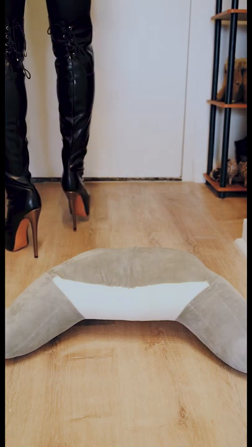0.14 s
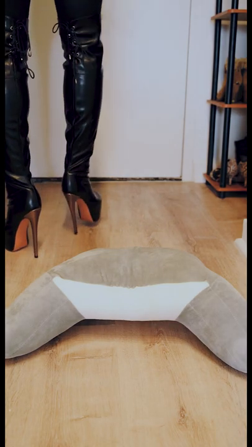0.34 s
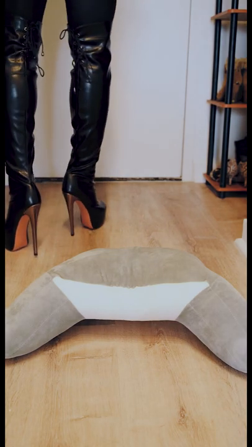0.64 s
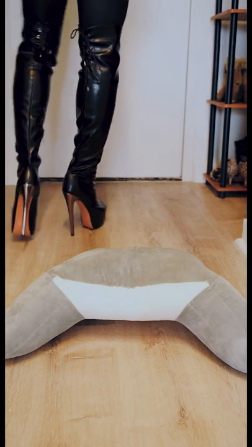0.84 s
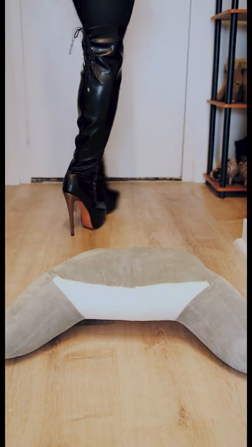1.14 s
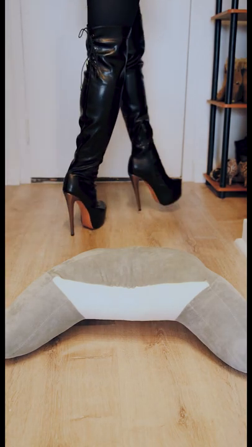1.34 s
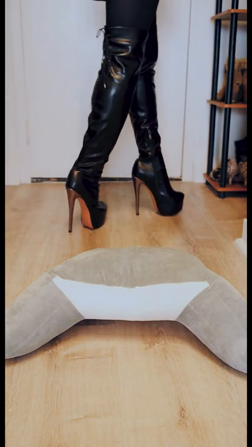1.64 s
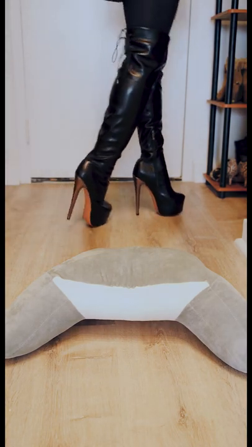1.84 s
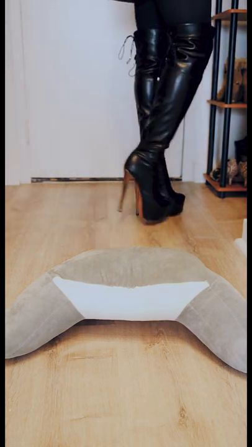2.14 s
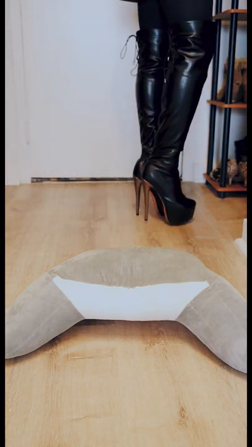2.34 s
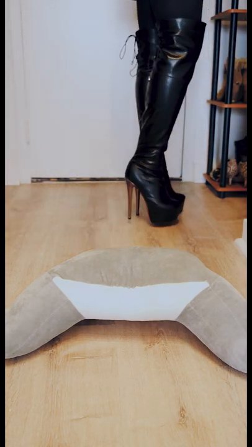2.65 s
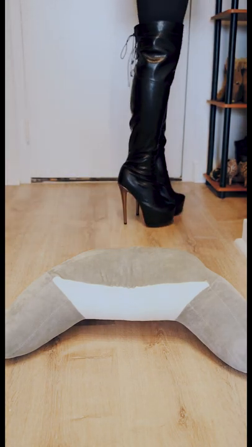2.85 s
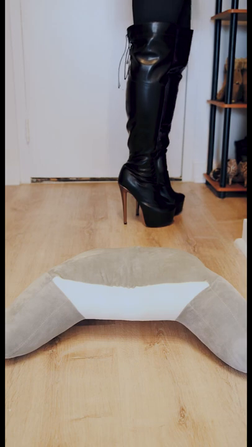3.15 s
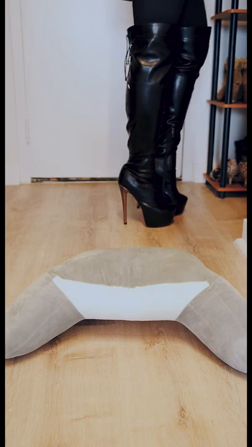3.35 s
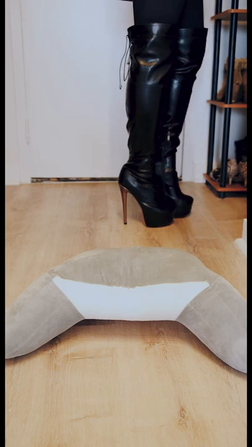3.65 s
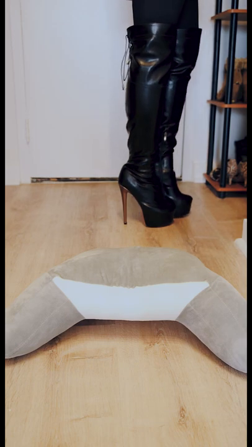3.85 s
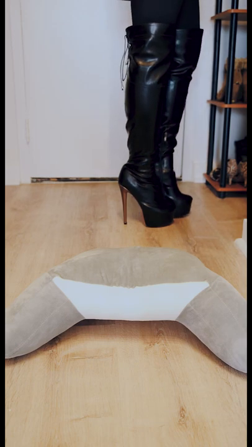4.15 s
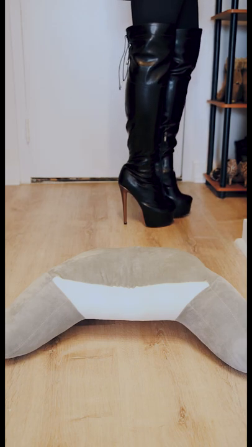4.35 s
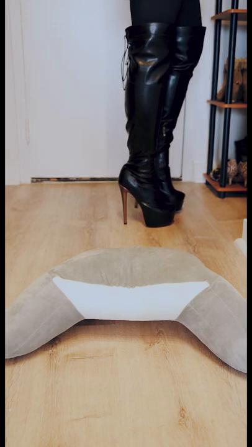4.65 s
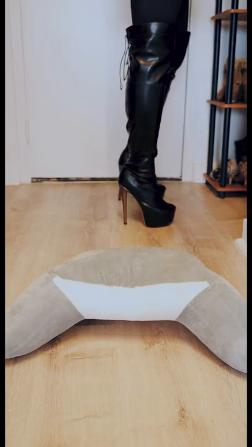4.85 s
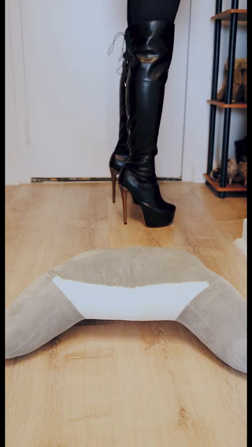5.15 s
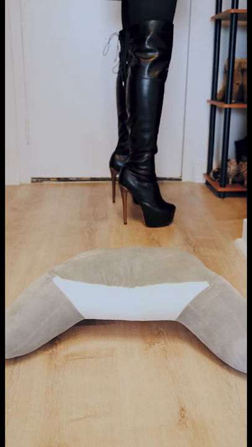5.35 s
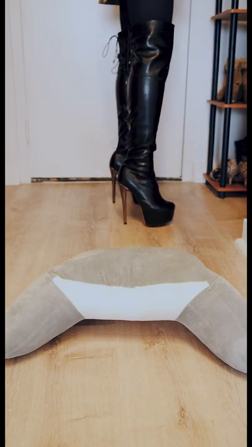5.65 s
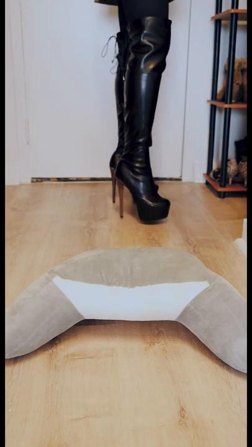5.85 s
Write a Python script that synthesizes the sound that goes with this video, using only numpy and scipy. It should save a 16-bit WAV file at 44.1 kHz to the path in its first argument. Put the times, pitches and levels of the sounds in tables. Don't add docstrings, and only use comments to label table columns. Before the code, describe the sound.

Hard stiletto-heeled platform boots take slow, uneven steps on a wooden floor in a small room, with scuffs, leather rustle and a low hum.

```python
import sys
import numpy as np
from scipy import signal
from scipy.fft import rfft, irfft
from scipy.io import wavfile
from scipy.ndimage import uniform_filter1d

SR = 44100
rng = np.random.default_rng(int(sys.argv[2]) if len(sys.argv) > 2 else 0)


def dump(signal):
    limited = np.clip(np.atleast_2d(signal).T, -1, 1)
    pcm = np.round(limited * 32767).astype(np.int16)
    wavfile.write(sys.argv[1], SR, pcm)


def attenuation_scalar(level_db):
    decades = np.asarray(level_db, float) / 20
    return 10 ** decades


N = 264159


def evened(x):
    return x / np.sqrt(np.mean(x ** 2) + 1e-20)


def read(points, hz):
    f, value = np.transpose(points)
    return np.interp(np.log(hz + 1), np.log(f + 1), value)


def add(mix, s, sound):
    part = mix[round(s * SR):][:len(sound)]
    part += sound[:len(part)]


def colour(x, spectrum):
    hz = np.fft.rfftfreq(len(x), 1 / SR)
    return evened(irfft(rfft(x) * attenuation_scalar(read(spectrum, hz)), len(x)))


def drift(rate_hz):
    t = np.arange(0, N + 64, 64) / SR
    rates = np.geomspace(0.1, 1, 16)
    slow = 0
    for rate, phase in zip(rates * rate_hz, rng.random(16)):
        slow = slow + np.sin(2 * np.pi * (rate * t + phase)) / np.sqrt(rate)
    return np.interp(np.arange(N) / SR, t, evened(slow))


def swell(middle, length):
    away = np.clip((np.arange(N) / SR - middle) / length, -0.5, 0.5)
    return np.cos(np.pi * away) ** 2


def whistle(hz, width_hz, size=N):
    r = np.exp(-np.pi * width_hz / SR)
    slow = rng.standard_normal(size) + 1j * rng.standard_normal(size)
    for _ in range(2):
        slow = signal.lfilter([1 - r], [1, -r], slow)
    slow = slow / abs(slow) ** 0.43
    carrier = np.exp(2j * np.pi * np.cumsum(hz * np.ones(size)) / SR)
    return evened((slow * carrier).real)


# frequency in Hz, level in dB per Hz.
AIR_SPECTRUM = [(8.8, -40), (15, -12.5), (65, -11), (92, -14), (174, -3.5), (220, -16.5), (247, -19.5),
                (340, -19), (512, -27.5), (1160, -36.5), (1260, -38.5), (1380, -36), (1600, -41.5),
                (3510, -49), (16000, -57.5)]


def air():
    return attenuation_scalar(-45) * colour(rng.standard_normal(N), AIR_SPECTRUM)


# time in seconds, level in dB.
HUM_LEVELS = [(0.0, -45), (0.2, -39), (0.85, -47), (1.12, -40), (1.3, -57), (1.53, -43), (2.4, -49),
              (2.59, -42), (2.76, -49), (3.17, -37.5), (3.42, -54.5), (3.7, -35.5), (4.1, -39.5),
              (4.7, -57), (5.99, -56)]


def hum():
    level = attenuation_scalar(np.interp(np.arange(N) / SR, *np.transpose(HUM_LEVELS)))
    return level * whistle(166.86 + 2.404 * drift(3), width_hz=8.2)


def rumble():
    return attenuation_scalar(-43.5 + 4.5 * drift(3.3)) * whistle(17, width_hz=27.4)


# frequency in Hz, bandwidth in Hz, level in dB.
DRONE_TONES = [(53.65, 9.6, -47), (108.3, 8.6, -53.5), (125.7, 9.7, -57), (206.3, 9.4, -52),
               (81.1, 8.5, -55)]


def drones():
    return sum(attenuation_scalar(db) * whistle(hz, width_hz) for hz, width_hz, db in DRONE_TONES)


# middle in seconds, length in seconds, level in dB.
LEG_SWINGS = [
    (0.0, 1.2, -61),
    (0.614, 0.87, -61.5),
    (1.067, 0.8, -61),
    (1.7, 0.55, -59.5),
    (2.035, 0.78, -62),
    (3.267, 0.95, -72),
    (4.997, 0.56, -68.5),
    (5.67, 0.98, -67),
]
# frequency in Hz, level in dB per Hz.
LEATHER_SPECTRUM = [(290, -7), (500, -2), (729, -2.5), (861, -7.5), (1200, -2.5), (1440, -6), (3520, -6.5),
                    (4790, -15.5), (8480, -18), (14000, -32.5)]


def rustle():
    motion = attenuation_scalar(-69.5)
    for s, length, db in LEG_SWINGS:
        motion = motion + attenuation_scalar(db) * swell(s, length)
    unevenness = evened(uniform_filter1d(rng.standard_normal(N), 300))
    grain = rng.standard_normal(N) * attenuation_scalar(0.89 * unevenness)
    return motion * colour(grain, LEATHER_SPECTRUM)


def ring(modes, detune, contact_ms):
    t = np.arange(SR // 8) / SR
    out = np.zeros(len(t))
    for (hz, db, t60), factor in zip(modes, detune):
        out += attenuation_scalar(db - 60 * t / t60) * np.sin(2 * np.pi * hz * factor * t)
    push = np.exp(-8 * (t[:200] * 1000 / contact_ms - 1) ** 2)
    out = np.convolve(out, push)[:len(t)]
    return out / abs(out).max()


def burst(grit, spectrum, decay_ms):
    t_ms = np.arange(len(grit)) * 1000 / SR
    shape = np.exp(-t_ms / decay_ms) * (1 - np.exp(-t_ms / 0.38))
    out = grit * shape
    for _ in range(4):
        z = rfft(out)
        out = colour(irfft(z / abs(z)), spectrum)
        limit = shape / shape.max() * abs(out).max()
        out = out * np.minimum(1, limit / (abs(out) + 1e-9))
    return out / abs(out).max()


# start in seconds, shoe knock in dB, board thud and heel tip in dB
FOOT_BLOWS = [(0.5018, -24.5, -2, -24.5, 0.73), (0.5934, -39, -18, -1, 1.4),
              (0.626, -36.5, -2.5, -10.5, 0.81), (1.4622, -37.5, 13.5, -2.5, 0.87),
              (1.5612, -16.5, 0, -21.5, 1.08), (1.95, -47.5, -26, -17, 0.97), (2.03, -42, -20, -14, 0.69),
              (2.8505, -10.5, -13, -17, 1.64), (3.159, -56, 0, 5, 0.87), (3.221, -34, -2, -15, 1.05),
              (3.6827, -35, -6, -6, 0.78), (3.7528, -28, 1, -7.5, 0.924), (4.434, -36.5, -6.5, -6.5, 1.1),
              (4.446, -48, -14, -15, 0.82), (5.146, -27, -5.5, -21.5, 1.12), (5.62, -50.5, -15, 8, 0.87),
              (5.724, -45, -1.5, -19, 1.05)]
# frequency in Hz, level in dB, t60 in seconds.
BOARD_MODES = [(291, -1, 0.012), (350, -4.5, 0.014), (396, 8.5, 0.026), (474, -1.5, 0.077),
               (480, -9.5, 0.0098)]
# frequency in Hz, level in dB, t60 in seconds.
SOLE_MODES = [(686, -8.5, 0.019), (746, 1.5, 0.022), (912, 6, 0.013), (946, -1, 0.021), (1264, 3.5, 0.014),
              (1522, 4, 0.012), (1900, -2, 0.0085)]
# frequency in Hz, level in dB.
TIP_SPECTRUM = [(1200, -9.5), (1900, 4.5), (2500, -2), (3500, -2.5), (4300, -12.5), (6000, -44)]
# frequency in Hz, level in dB.
GRIT_SPECTRUM = [(3300, -25), (4600, -1.5), (6200, 1), (8500, -6), (11000, -14.5), (16000, -31)]


def blows():
    out = np.zeros(N)
    spots = rng.uniform(0.86, 1.05, (len(FOOT_BLOWS), 2, len(SOLE_MODES)))
    grits = rng.standard_normal((len(FOOT_BLOWS), 2, 1024))
    push_ms = np.arange(88) * 1000 / SR
    air_push = np.exp(-0.5 * ((push_ms - 1) / 0.12) ** 2)
    for (s, db, thud_db, tip_db, pitch), spot, grit in zip(FOOT_BLOWS, spots, grits):
        knock = ring(SOLE_MODES, spot[0], contact_ms=0.42)
        thud = ring(BOARD_MODES, spot[1] * pitch, contact_ms=1.1)
        tick = burst(grit[0], TIP_SPECTRUM, decay_ms=2.6)
        snap = burst(grit[1], GRIT_SPECTRUM, decay_ms=3.2)
        add(out, s + 0.00081, 0.5 * attenuation_scalar(db) * knock)
        add(out, s + 0.0016, attenuation_scalar(db) * knock)
        add(out, s + 0.0012, attenuation_scalar(db - 9.5) * air_push)
        add(out, s + 0.00044, attenuation_scalar(db + thud_db) * thud)
        add(out, s + 0.001225, attenuation_scalar(db + tip_db) * tick)
        add(out, s + 0.00073, attenuation_scalar(db + tip_db - 10.5) * snap)
    return signal.lfilter(*signal.butter(2, 150, "high", fs=SR), out)


# start in seconds, level in dB, frequency in Hz,
# t60 in seconds.
EDGE_RINGS = [(.503, -37, 2270, 0.022), (.503, -35.5, 1400, 0.026), (0.5958, -28, 1890, 0.02),
              (.897, -42, 1220, .04), (1.464, -49, 1530, 0.033), (1.463, -33.5, 680, .05),
              (1.463, -45, 6040, .015), (1.56, -26, 1988, .035), (1.949, -43, 1120, 0.043),
              (2.852, -20, 2220, 0.025), (2.852, -30, 3240, 0.016), (3.222, -52, 2300, .02),
              (3.682, -35, 3230, 0.029), (3.754, -34, 2500, .025), (3.754, -37.5, 800, .04),
              (4.435, -38, 990, 0.034), (4.435, -44, 2640, 0.022), (5.621, -39, 2700, 0.017)]


def rings():
    out, t = np.zeros(N), np.arange(SR // 8) / SR
    spread = np.linspace(-1, 1, 6) + rng.uniform(-0.082, 0.069, (len(EDGE_RINGS), 6))
    for (s, db, hz, t60), row in zip(EDGE_RINGS, spread):
        mode_hz = hz * (1 + 0.194 * row[:, None])
        cluster = np.sin(2 * np.pi * mode_hz * t).mean(0)
        add(out, s, attenuation_scalar(db - 60 * t / t60) * cluster)
    return out


# start in seconds, level in dB, frequency in Hz,
# t60 in seconds.
JOIST_BOOMS = [
    (0.508, -36, 80, 0.53),
    (1.455, -27, 170, 0.076),
    (1.572, -26.5, 65.4, 0.32),
    (2.852, -26.5, 75.1, 0.87),
    (3.692, -27.5, 78.4, 0.37),
    (3.762, -25.5, 77.1, 0.83),
]


def booms():
    out, t = np.zeros(N), np.arange(SR) / SR
    for s, db, hz, t60 in JOIST_BOOMS:
        onset = 1 - np.exp(-t / 0.013)
        add(out, s, attenuation_scalar(db - 60 * t / t60) * onset * np.sin(2 * np.pi * hz * t))
    return out


# start in seconds, level in dB, centre frequency in Hz.
SOLE_CRACKS = [(.581, -49, 8350), (0.628, -51, 7000), (.644, -49, 9500), (.691, -53, 10000),
               (0.704, -53, 11000), (0.7125, -33.5, 6960), (.707, -40, 10000), (0.722, -41, 7500),
               (0.728, -46, 8000), (0.745, -42, 10000), (.7505, -34, 2780), (0.7503, -42, 7000),
               (1.574, -42, 5760), (1.618, -48, 8950), (1.680, -45, 9050), (1.7217, -38, 7900),
               (1.7425, -43, 6040), (1.7213, -37.5, 2290), (1.7428, -34.5, 2500), (3.258, -47, 8000),
               (3.278, -46, 5170), (3.311, -43, 4060), (3.336, -41, 3000), (4.5215, -44, 5500),
               (5.53, -43.5, 7580), (5.577, -42.5, 2500), (5.621, -45, 3950), (5.7015, -41, 6400),
               (5.727, -46, 5920), (5.744, -46, 7000)]


def cracks():
    out, t = np.zeros(N), np.arange(128) / SR
    grits = rng.standard_normal((len(SOLE_CRACKS), len(t))) * np.exp(-t / 0.00016)
    bins_hz = np.fft.rfftfreq(256, 1 / SR)
    for (s, db, hz), grit in zip(SOLE_CRACKS, grits):
        band = np.exp(-2 * ((bins_hz / hz - 1) / 0.75) ** 2)
        snap = irfft(rfft(np.pad(grit, 64)) * band)
        add(out, s - 64 / SR, attenuation_scalar(db) * snap / abs(snap).max())
    return out


# peak in seconds, level in dB, swell in seconds, fade in seconds,
# body of the shoe in dB against the level.
SOLE_SCUFFS = [
    (0.715, -44, 0.055, 0.067, 5.5),
    (1.772, -42, 0.075, 0.062, 1.5),
    (3.164, -52.5, 0.022, .12, -5),
    (3.314, -45, 0.094, 0.11, 1),
    (4.523, -46, 0.02, 0.043, 6),
    (4.565, -46.5, 0.031, 0.025, -2),
    (5.53, -54.5, 0.023, 0.22, -8),
    (5.624, -44.5, 0.062, 0.035, 0),
    (5.742, -51.5, 0.13, 0.098, -4),
]
# frequency in Hz, level in dB per Hz.
SCUFF_SPECTRUM = [(1200, -50), (1900, -8.5), (3300, 1), (4600, -11), (6200, -5), (8200, -10.5),
                  (11000, -18.5), (15500, -44)]


def scuffs():
    unevenness = evened(uniform_filter1d(rng.standard_normal(N), 60))
    slips = rng.standard_normal(N) * attenuation_scalar(5.5 * unevenness)
    hiss = colour(slips, SCUFF_SPECTRUM)
    body = colour(slips, [(400, -3), (650, -4.5), (1250, -4.5), (1900, -5.5), (2500, -25.5)])
    out, t = np.zeros(N), np.arange(N) / SR
    for s, db, swell_s, fade_s, body_db in SOLE_SCUFFS:
        away = np.maximum((s - t) / swell_s, (t - s) / fade_s)
        out += attenuation_scalar(db - 30 * away) * (hiss + attenuation_scalar(body_db) * body)
    return out


# start in seconds, length in seconds, starting frequency in Hz,
# climb in Hz per second, level in dB.
ENGINE_ORDERS = [(3.7, .95, 170, 16, -38.5), (3.7, 1.1, 204, 22, -46), (4.8, 1.7, 138, 18, -45),
                 (4.85, 1.1, 184, 27, -52), (4.8, .75, 177, 4, -46), (5.15, .55, 344, 17, -53.5),
                 (3.3, .4, 368, 10, -57), (4.5, .45, 375, 5, -54), (4.65, .45, 329, 10, -54),
                 (4.75, .4, 392, 5, -57), (4.6, .5, 281, 5, -56)]


def engine():
    out, t = np.zeros(N), np.arange(2 * SR) / SR
    for s, length, hz, climb, db in ENGINE_ORDERS:
        order = whistle(hz + climb * t, 3.7, size=len(t))
        add(out, s, attenuation_scalar(db) * swell(length / 2, length)[:len(t)] * order)
    return out


# frequency in Hz, t60 in seconds.
ROOM_DECAY = [(100, 0.48), (260, 0.14), (700, 0.37), (1840, 0.24), (4000, 0.3), (6500, 0.31), (12000, 0.2)]
# delay in seconds, level in dB.
EARLY_ECHOES = [(0.002293, -11.5), (0.001675, -14), (.0042, -6.5), (.0102, -8), (0.016, -13.5),
                (.0120, -10), (0.011, -16), (0.014, -52), (0.035, -17.5)]


def room(x, tail_db):
    early, out = np.zeros(SR // 20), np.zeros(N)
    for k, (s, db) in enumerate(EARLY_ECHOES):
        early[round(s * SR)] = attenuation_scalar(db) * (-1) ** (k + 1)
    early = signal.lfilter([0.3], [1, -0.7], early)
    for k in range(3):
        taps = np.zeros(SR // 2)
        at = np.arange(150, len(taps) - 20, 20)
        taps[at + rng.integers(0, 20, len(at))] = rng.choice([-1.0, 1.0], len(at))
        hz, t, z = signal.stft(taps, SR, nperseg=256)
        decay = attenuation_scalar(-60 * t / read(ROOM_DECAY, hz)[:, None])
        tail = signal.istft(z * decay, SR, nperseg=256)[1]
        turn = np.cos(2 * np.pi * (np.arange(N) / SR * 0.8263 + k / 3)) * np.sqrt(2 / 3)
        out += signal.fftconvolve(x * turn, tail / np.linalg.norm(tail))[:N]
    return x + signal.fftconvolve(x, early)[:N] + attenuation_scalar(tail_db) * out


def scene():
    slips = cracks()
    steps = attenuation_scalar(4.5) * blows() + rings() + attenuation_scalar(-4) * scuffs() + 0.95 * slips
    feet = room(steps, tail_db=-2.0) + slips
    background = air() + hum() + rumble() + drones() + engine()
    return (feet + booms() + attenuation_scalar(1.0) * rustle() + background)[None]


def band_limit(x):
    return signal.sosfilt(signal.butter(12, 16260, fs=SR, output="sos"), x)


def record(dry):
    limited = signal.oaconvolve(dry, signal.firwin(255, 15900, fs=SR)[None], "same")
    return band_limit(limited)


dry = scene()
out = record(dry)
dump(out)
```